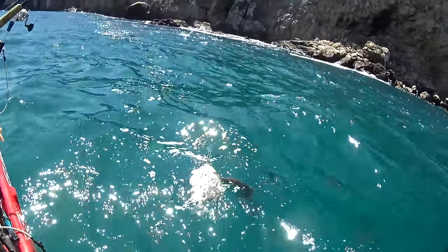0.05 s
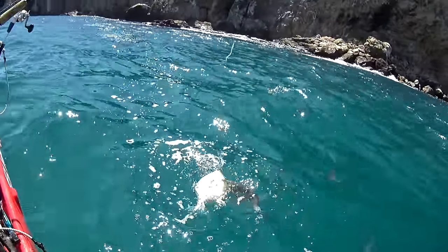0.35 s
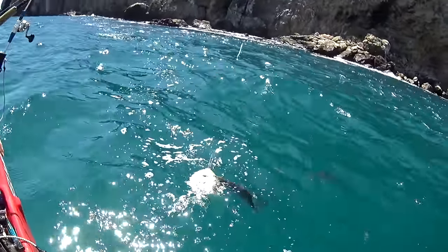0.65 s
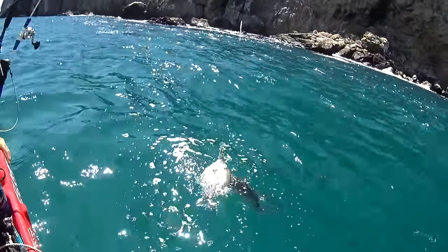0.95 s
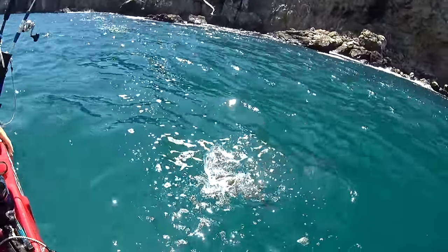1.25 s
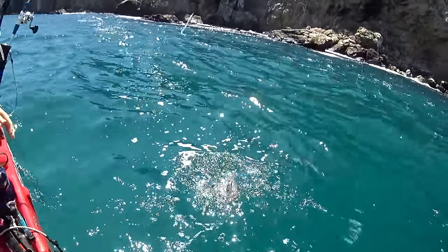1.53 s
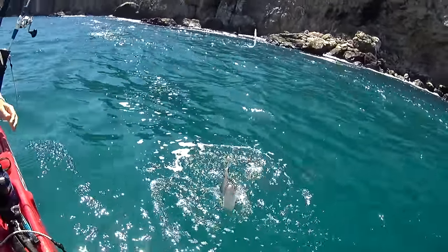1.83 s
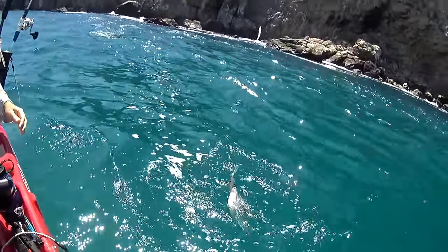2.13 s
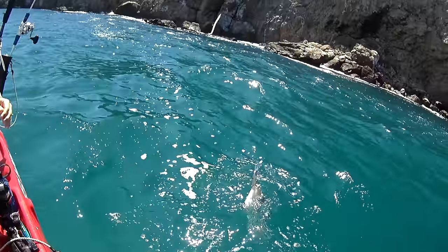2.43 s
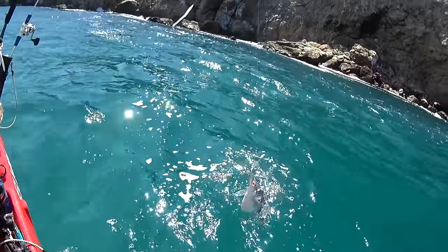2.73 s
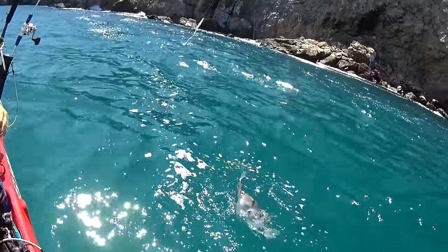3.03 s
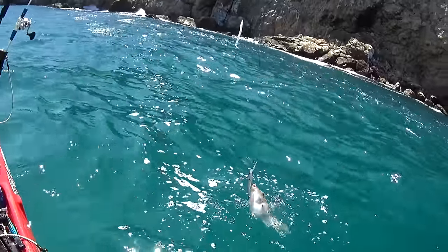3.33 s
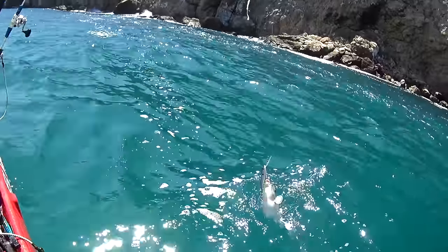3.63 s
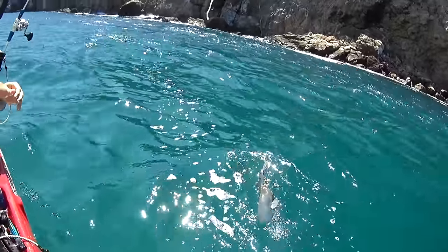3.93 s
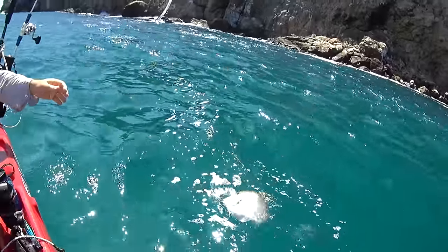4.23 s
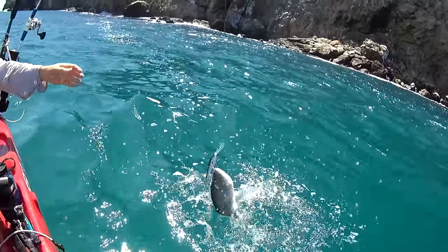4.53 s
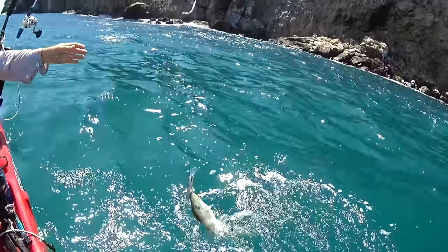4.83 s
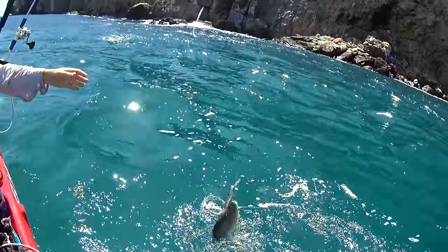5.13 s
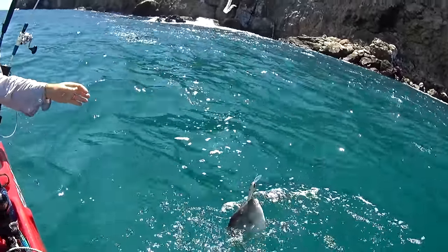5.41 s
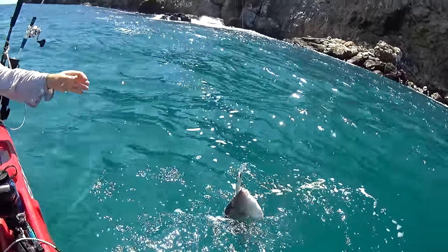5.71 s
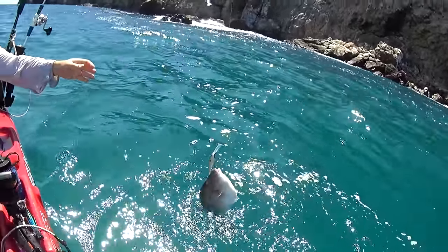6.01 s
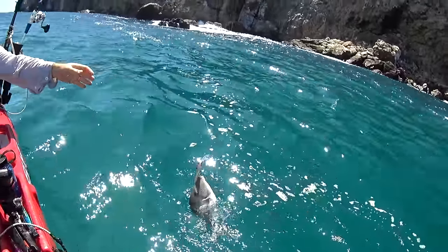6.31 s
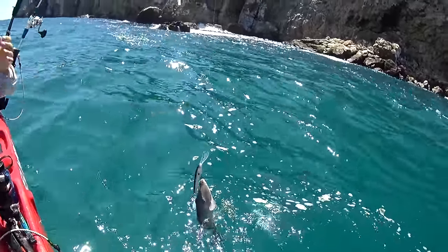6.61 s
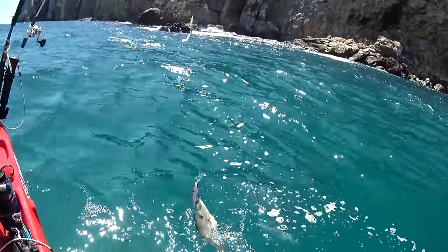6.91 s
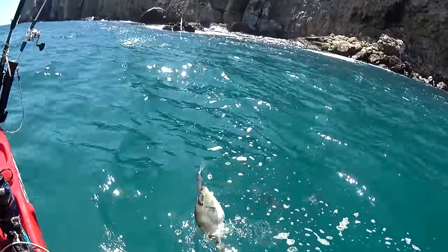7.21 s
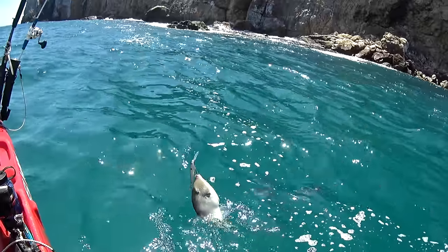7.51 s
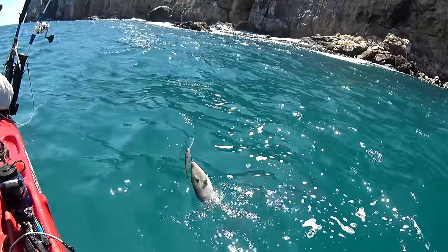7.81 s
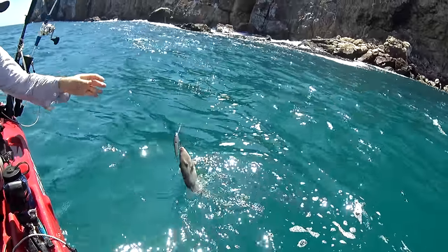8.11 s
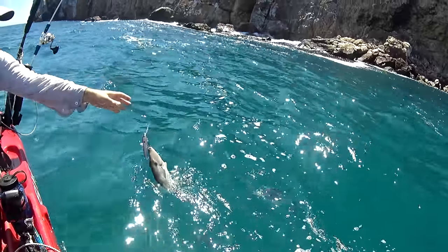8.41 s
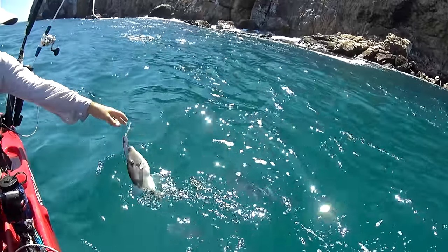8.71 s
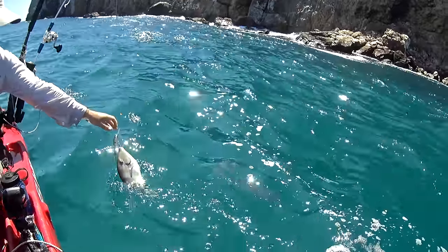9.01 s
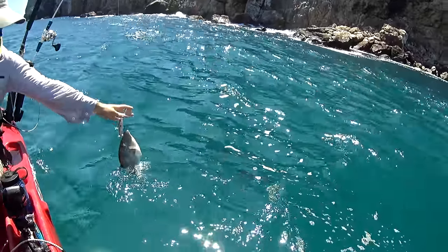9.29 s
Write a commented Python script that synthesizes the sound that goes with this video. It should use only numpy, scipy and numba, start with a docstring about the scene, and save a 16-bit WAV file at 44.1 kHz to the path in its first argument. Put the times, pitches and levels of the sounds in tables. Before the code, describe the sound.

A fish struggles at the sea surface close to the microphone, slightly to the right, with crisp slaps, bubbling spray and small gulps. After a quieter spell of light splashing it thrashes again, harder and longer, then only single drops fall until a final little splash. Underneath runs a soft, even hiss of surf on rocks and faint lapping against a small boat's hull.

```python
"""Surf washes steadily on rocks and ripples lap under a small boat. From 0.4 s a hooked fish thrashes at the
surface: its body slaps the water and throws sheets of spray, all ringing as clouds of tiny bubbles, while
air pockets gulp. After 1.4 s come lighter splashes, from 4.2 to 5 s the longest bout, then single drops
and a last small splash at 9.4 s. Two close microphone ports hear the scene from slightly right."""
import sys
import numpy as np
from scipy import signal
from scipy.fft import rfft, irfft, next_fast_len
from scipy.io import wavfile
from numba import njit

SR = 44100
rng = np.random.default_rng(int(sys.argv[2]) if len(sys.argv) > 2 else 0)


def log_audio(samples):
    """Write samples as a 16-bit WAV file to the path given in sys.argv[1]."""
    # one column per channel
    frames = np.atleast_2d(samples).T
    # limit to full scale, then quantise
    limited = np.clip(frames, -1, 1)
    pcm = np.round(limited * 32767).astype(np.int16)
    wavfile.write(sys.argv[1], SR, pcm)


N = 421155

# balance as the boat swings, left over right: t/s, fish/dB, foam hiss/dB
BALANCE = [(0, 2, -3), (.7, 3.5, -1.5), (1.2, -.8, -2.5), (1.7, -1, -4.5), (3.3, 1.5, -2.5),
           (4.3, -1, -1.5), (6.8, -1.5, -1.3), (8.6, 3, -3), (9.5, 1, -2.2)]


def from_db(db):
    return 10 ** (np.asarray(db) / 20)


def unit_rms(x):
    return x / np.sqrt(np.mean(x ** 2) + 1e-20)


def in_time(rows):
    """Columns of a time curve at every sample."""
    times_s, *columns = np.transpose(rows)
    return [np.interp(np.arange(N) / SR, times_s, column) for column in columns]


def at_hz(rows, hz):
    """Table read on a log-frequency axis."""
    knots_hz, values = np.transpose(rows)
    return np.interp(np.log(np.maximum(hz, 1)), np.log(knots_hz), values)


def drift(rate_hz):
    """Slow random wander, rms 1."""
    hop, settle = 40, 2000
    pole = np.exp(-2 * np.pi * rate_hz * hop / SR)
    white = rng.standard_normal(N // hop + settle + 2)
    slow = signal.lfilter([1], [1, -2 * pole, pole * pole], white)[settle:]
    return np.interp(np.arange(N) / hop, np.arange(len(slow)), unit_rms(slow))


def envelope(start_s, hold_s, level_db, rise_db_per_s, fall_db_per_s):
    """Gain that rises until start_s, holds and falls."""
    t = np.arange(N) / SR - start_s
    down_db = rise_db_per_s * np.maximum(-t, 0) + fall_db_per_s * np.maximum(t - hold_s, 0)
    return from_db(level_db - np.minimum(down_db, 200))


def high_pass(x, hz, order=2):
    """Bubbles just under the surface radiate little bass."""
    return signal.sosfilt(signal.butter(order, hz, "high", fs=SR, output="sos"), x + 1e-18)


def low_pass(x, hz, order=2):
    return signal.sosfilt(signal.butter(order, hz, fs=SR, output="sos"), x)


def add(out, start_s, sound):
    i = max(0, round(start_s * SR))
    out[i:i + len(sound)] += sound[:max(0, N - i)]


def with_energy(burst, level_db, length_s):
    """Burst scaled to the energy of level_db held for length_s."""
    return burst * from_db(level_db) * np.sqrt(length_s * SR / (np.sum(burst ** 2) + 1e-20))


def panned(x, pan_db, top_hz=11000):
    """Stereo, left louder by pan_db below top_hz."""
    low = signal.sosfiltfilt(signal.butter(3, top_hz, fs=SR, output="sos"), x)
    return x - low + low * from_db(pan_db * np.array([[.5], [-.5]]))


@njit
def ring_bubbles(n, start_s, height, hz, decay_s, rise):
    """Dying sines; pitch climbs by the share `rise` per decay time as each bubble nears the surface."""
    out = np.zeros(n)
    for k in range(len(start_s)):
        first, life, phase = int(start_s[k] * SR), decay_s[k] * SR, 0.
        for i in range(min(int(6 * life), n - first)):
            pitch_hz = hz[k] * (1 + rise * i / life)
            if pitch_hz > .45 * SR:
                break
            phase += 2 * np.pi * pitch_hz / SR
            out[first + i] += height[k] * np.exp(-i / life) * np.sin(phase)
    return out


def cloud(n, start_s, hz, octaves, cycles, size_db, rise):
    """Bubbles of scattered pitch, size and damping; octaves and size_db are standard deviations."""
    pitch, size, damping, sign = rng.standard_normal((4, len(start_s)))
    pitch_hz = np.clip(hz * 2 ** (octaves * pitch), hz / 5, .4 * SR)
    height = from_db(size_db * np.minimum(size, 2)) * np.sign(sign) * np.sqrt(pitch_hz / hz)
    decay_s = cycles * from_db(3 * damping) / pitch_hz
    return ring_bubbles(n, np.maximum(start_s, 0), height, pitch_hz, decay_s, rise)


def random_times(count):
    return rng.random(count) * N / SR


def surf_noise(spectrum, flicker_db):
    """Breaking water as half-octave noise bands, each flickering alone; stereo, rms 1."""
    # likeness at the two ports: f/Hz, coherence/0-1
    coherence = [(150, 0.93), (600, 0.94), (1200, 1), (2400, 0.75), (4000, 1), (10000, 0.84), (14000, 0.95)]
    out, edges_hz = 0, 30 * 2 ** np.arange(0, 9.6, .5)
    white = rng.standard_normal((2, 2, N))
    for k, band_hz in enumerate(zip(edges_hz, edges_hz[1:])):
        hz = np.sqrt(np.prod(band_hz))
        if spectrum[0][0] / 2 < hz < spectrum[-1][0] * 2:
            band = signal.butter(2, band_hz, "band", fs=SR, output="sos")
            mid, side = signal.sosfilt(band, white[k % 2])
            alike = at_hz(coherence, hz)
            gain = from_db(at_hz(spectrum, hz) + flicker_db * drift(rate_hz=22.5))
            out = out + gain * (np.sqrt(1 + alike) * mid + np.sqrt(1 - alike) * side * [[1], [-1]])
    return unit_rms(out)


def surf():
    """Roar and foam hiss on the rocks, swelling slowly; distance takes off the top."""
    # relative surf levels: t/s, roar/dB, hiss/dB
    levels = [(0.0, -50, -45), (0.3, -49, -43), (0.45, -50.5, -39.5), (1.05, -49, -39.5),
              (2.1, -49.6, -39.5), (2.25, -50, -41.5), (3.3, -51.0, -39.5), (3.45, -50, -41),
              (3.9, -51.0, -39), (5.7, -52.5, -40.5), (7.2, -50.5, -39.5), (7.65, -48.5, -38),
              (8.4, -49.8, -39.5), (8.55, -47.5, -37.5), (9.15, -50, -38.5), (9.55, -48.5, -37.5)]
    # relative spectral densities: f/Hz, level/dB
    roar_spectrum = [(30, -36), (60, -34), (110, -17), (165, -14.5), (300, -2), (500, 0), (900, 5.5),
                     (1300, -1), (2000, 0), (4000, -14.5)]
    hiss_spectrum = [(600, -22), (1200, -2), (2000, -1.5), (4200, 2), (6200, -2), (8300, -5.5),
                     (10000, -12), (13500, -29), (16000, -10)]
    roar_db, hiss_db = in_time(levels)
    _, pan_db = in_time(BALANCE)
    roar = from_db(roar_db + 3.5) * surf_noise(roar_spectrum, flicker_db=1.02)
    hiss = from_db(hiss_db + 2.5) * surf_noise(hiss_spectrum, flicker_db=.66)
    return roar + panned(low_pass(hiss, hz=10400, order=1), pan_db)


def lapping():
    """Ripples fold small air pockets under the hull as each swell passes."""
    # swell crests: t/s, relative level/dB
    crests = [(0, -57.5), (2.3, -63), (4.95, -58), (8.1, -57), (8.8, -56.5), (9.5, -57)]
    slope_db_per_s = 13
    swell = np.max([envelope(t, 0, db, slope_db_per_s, slope_db_per_s) for t, db in crests], axis=0)
    pockets = cloud(N, random_times(1200), hz=217, octaves=.423, cycles=1.6, size_db=1.5, rise=.022)
    return from_db(-5) * swell * unit_rms(high_pass(pockets, hz=144, order=4))


def plinks():
    """Larger bubbles ring out alone."""
    # single bubbles: t/s, peak/dB, f/Hz, decay to 1/e in cycles
    bubbles = [(.234, -24, 10500, 11), (.384, -25, 1210, 3.4), (0.663, -18, 4400, 34), (.67, -22, 2000, 45),
               (.752, -21, 2380, 11), (1.11, -15, 3120, 4.6), (1.149, -17, 2130, 4),
               (1.169, -12, 3800, 3.7), (1.196, -15.5, 1600, 6), (1.402, -21, 2280, 11),
               (1.775, -33, 950, 4.6), (2.102, -25, 3000, 10), (2.307, -30, 2870, 10),
               (2.766, -30, 4200, 23), (3.271, -26, 4600, 11), (4.243, -23, 1870, 13),
               (4.659, -15.5, 4680, 28), (4.804, -19, 2780, 8), (4.83, -18, 3340, 9), (5.555, -20, 5630, 8),
               (5.801, -19.5, 6750, 16), (9.374, -21.5, 4660, 13)]
    start_s, peak_db, hz, cycles = np.transpose(bubbles)
    return high_pass(ring_bubbles(N, start_s, from_db(peak_db), hz, cycles / hz, rise=.018), hz=606)


def slaps():
    """A crack, a crowd of damped bubbles thinning within milliseconds, and trapped air ringing lower."""
    # impacts of the body and of heavy drops: t/s, level/dB, bubble f/Hz
    impacts = [(.382, -28.5, 3320), (.534, -30, 3560), (.851, -32.5, 5900), (.87, -32, 4440),
               (0.896, -30, 4500), (1.112, -15, 6600), (1.156, -19, 7200), (1.243, -24, 6440),
               (1.324, -17, 8850), (1.361, -28, 5800), (2.034, -30, 4230), (2.76, -28.5, 8000),
               (2.78, -30, 6900), (3.034, -31.5, 7200), (3.884, -29.5, 4040), (4.175, -23.5, 8600),
               (4.189, -14.5, 10100), (4.21, -14, 8300), (4.218, -14, 7540), (4.25, -25, 8000),
               (4.347, -13, 6500), (4.426, -20.5, 6900), (4.447, -18, 8700), (4.516, -17, 5900),
               (4.616, -18, 6600), (4.654, -18, 6800), (4.676, -22, 8300), (4.73, -16.5, 7600),
               (4.747, -23, 7740), (4.824, -19.5, 6170), (4.889, -24, 9900), (4.936, -21.5, 6430),
               (4.968, -29.5, 9000), (4.995, -24.5, 9900), (5.139, -26.5, 7700), (5.169, -23.5, 7400),
               (5.265, -30, 12000), (5.554, -30, 6800), (5.916, -33, 11700), (6.582, -30.5, 10100),
               (7.323, -29.5, 5850), (9.374, -27, 6640), (9.387, -26, 8050), (9.413, -29.5, 8400)]
    out, n = np.zeros(N), SR // 10
    for start_s, level_db, hz in impacts:
        weight = from_db((level_db + 25) * .42)  # heavier slaps take longer to enter the water
        crack_s = rng.random(6) * .00037 * weight
        crack = cloud(n, crack_s, hz * 1.24, octaves=.47, cycles=1.34, size_db=-5.5, rise=.04)
        crowd_s = rng.exponential(.0012, 20) * weight
        crowd = cloud(n, crowd_s, hz, octaves=.544, cycles=3.1, size_db=1.5, rise=.12)
        cavity_s = rng.random(6) * .007
        cavity = cloud(n, cavity_s, hz * .277, octaves=.337, cycles=2, size_db=4, rise=.045)
        splash = from_db(1) * unit_rms(crack) + weight * unit_rms(crowd)
        burst = unit_rms(high_pass(splash, hz * .33, order=3))
        burst += from_db(-18) * unit_rms(high_pass(cavity, hz * .16, order=3))
        add(out, start_s + .0005, with_energy(burst, level_db, length_s=.0049))
    return out


def gulps():
    """Trapped air pockets wobble well below the spray in pitch and are soon damped."""
    # pockets by the fish and the hull: t/s, length/s, relative level/dB, f/Hz
    pockets = [(0.387, .035, -40.5, 900), (0.659, .11, -45, 1140), (.965, 0.047, -53, 176),
               (1.755, 0.042, -36, 1330), (3.898, 0.08, -54, 186), (3.926, 0.035, -41.5, 514),
               (4.416, .021, -40, 850), (4.638, .06, -46, 245), (7.315, .029, -37.5, 665)]
    out = np.zeros(N)
    for start_s, length_s, level_db, hz in pockets:
        burst = cloud(SR // 2, length_s * rng.random(16), hz, octaves=.38, cycles=1.7, size_db=3, rise=.02)
        add(out, start_s, with_energy(high_pass(burst, hz * .71, order=4), level_db - 3.5, length_s))
    return out


def sheets():
    """A thrown sheet swells and tears into hundreds of bubbles; a coarse sheet holds few tiny ones."""
    # water thrown by the tail: t/s, length/s, level/dB, bubble f/Hz
    throws = [(0.418, 0.061, -41.5, 5200), (0.631, 0.016, -27.5, 3800), (0.652, 0.055, -27, 3880),
              (0.701, 0.078, -25, 4440), (1.077, .012, -32, 4800), (1.124, .034, -26.5, 5200),
              (1.17, .032, -23.5, 5350), (1.231, .045, -25, 5900), (1.347, 0.02, -28, 5740),
              (2.055, 0.051, -40, 3680), (2.657, .016, -36.5, 5190), (2.744, .04, -35.5, 5350),
              (4.203, 0.023, -25, 8150), (4.325, .034, -23, 6500), (4.416, 0.023, -23, 7100),
              (4.457, .04, -27.5, 7800), (4.564, 0.045, -32.5, 6000), (4.63, .017, -29, 8100),
              (4.658, 0.036, -25, 6500), (4.798, .05, -29, 5830), (4.917, 0.021, -31.5, 6500)]
    out = np.zeros(N)
    for start_s, length_s, level_db, hz in throws:
        born_s = length_s * (.75 * rng.random(400) + .4 * rng.random(400) - .06)
        burst = cloud(SR // 5, born_s, hz, octaves=.7, cycles=3.4, size_db=3.5, rise=.03)
        burst = high_pass(burst, hz * .21, order=3)
        burst = low_pass(burst, min(hz * 2.7, .42 * SR))
        add(out, start_s, with_energy(burst, level_db, length_s))
    return out


def spray():
    """Thrashing stirs up fizz, ringing bubbles and low churn; thrown droplets tick down for longer."""
    # bouts: t/s, length/s, relative level/dB, fizz fall/(dB/s), droplets re level/dB
    bouts = [(.44, 0.2, -41, 150, -17), (0.66, 0.064, -31.5, 200, -12), (1.112, .23, -31.5, 90, -14),
             (1.776, .25, -46.5, 17, -9.5), (2.663, 0.066, -43.5, 55, -7.5), (4.209, .42, -28.5, 27, -8.5),
             (5.136, 0.042, -38.5, 18.5, -7.5), (7.52, 0.072, -47, 59, -9), (9.373, .03, -44, 100, -8)]
    rise_db_per_s, droplet_fall_share = 380, .48
    drip_db = -63  # the hanging fish always drips a little
    stirred, falling = 0, from_db(drip_db)
    for start_s, length_s, level_db, fall_db_per_s, drops_db in bouts:
        bout = envelope(start_s, length_s, level_db, rise_db_per_s, fall_db_per_s)
        shower = envelope(start_s, length_s, level_db + drops_db,
                          rise_db_per_s, fall_db_per_s * droplet_fall_share)
        stirred, falling = np.maximum(stirred, bout), np.maximum(falling, shower)
    fizz = cloud(N, random_times(40000), hz=6950, octaves=.71, cycles=2.9, size_db=.5, rise=.026)
    drops = cloud(N, random_times(2400), hz=9200, octaves=.45, cycles=1.8, size_db=6.5, rise=.04)
    rings = cloud(N, random_times(3000), hz=5400, octaves=.7, cycles=9, size_db=4.5, rise=.03)
    churn = cloud(N, random_times(2000), hz=1396, octaves=.517, cycles=4.5, size_db=1.5, rise=.052)
    bubbles = from_db(-2.5) * unit_rms(high_pass(fizz, hz=1030, order=3))
    bubbles += from_db(-5) * unit_rms(high_pass(rings, hz=800))
    bubbles += from_db(-22.5) * unit_rms(high_pass(churn, hz=650, order=3))
    droplets = unit_rms(high_pass(drops, hz=3200))
    clumps = from_db(2.5 * drift(rate_hz=37))
    return (stirred * bubbles + falling * droplets) * clumps


def ports(x):
    """Sound from the right reaches the right port first."""
    # lead of the right port: f/Hz, phase/rad
    phase_lead = [(30, .1), (150, 0.73), (300, 0.8), (600, 1.11), (1200, 1.41), (2200, 1.07), (4000, 0.87),
                  (6500, 0.44), (10000, 0), (16000, 0)]
    n = next_fast_len(N + SR // 10)
    lead_rad = at_hz(phase_lead, np.arange(n // 2 + 1) * SR / n)
    shift = np.exp(.5j * lead_rad * np.array([[-1], [1]]))
    return irfft(rfft(x, n) * shift, n)[:, :N]


def scene():
    """Fish, water at the hull and surf, at the two ports."""
    pan_db, _ = in_time(BALANCE)
    fish = spray() + sheets() + slaps() + plinks()
    return ports(panned(fish, pan_db) + gulps() + lapping() + surf())


def record(dry):
    """The microphone housing colours the treble; the top is cut."""
    # housing peaks and notches: f/Hz, width/Hz, share added
    resonances = [(8160, 680, 0.37), (8770, 340, -0.87), (12100, 950, -0.55), (13500, 1200, 0.12)]
    cutoff_hz = 15750
    for hz, width_hz, share in resonances:
        b, a = signal.iirpeak(hz, hz / width_hz, fs=SR)
        dry = dry + share * signal.lfilter(b, a, dry)
    return signal.sosfilt(signal.ellip(10, .1, 70, cutoff_hz, fs=SR, output="sos"), dry)


dry = scene()
out = record(dry)
log_audio(out)
```